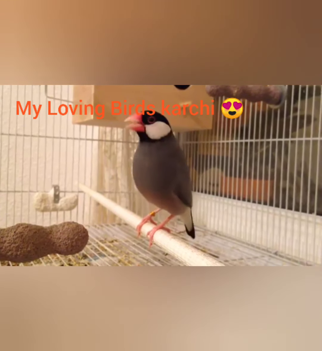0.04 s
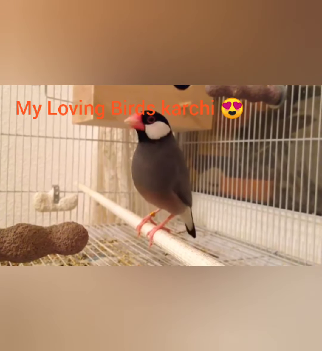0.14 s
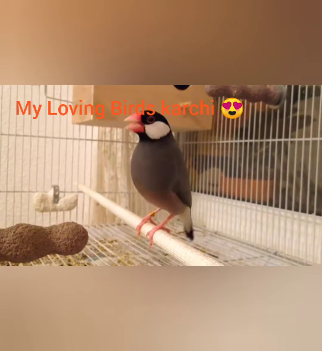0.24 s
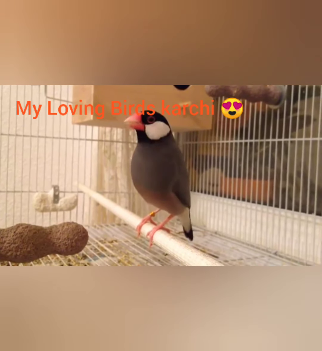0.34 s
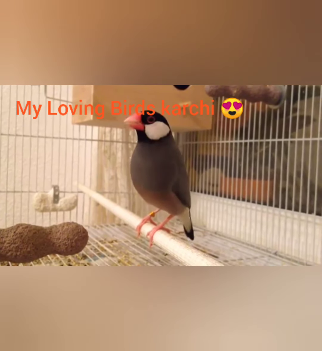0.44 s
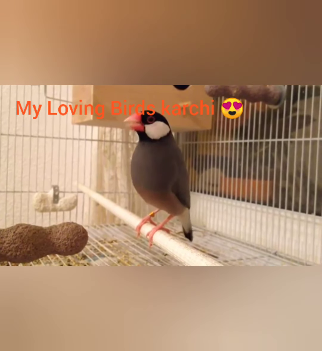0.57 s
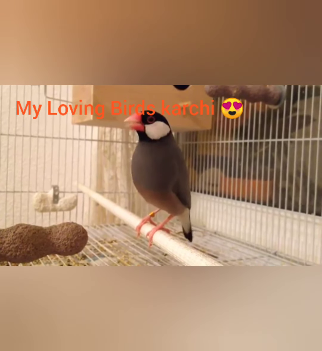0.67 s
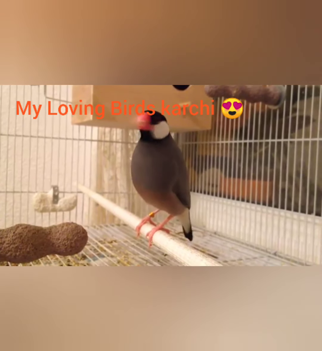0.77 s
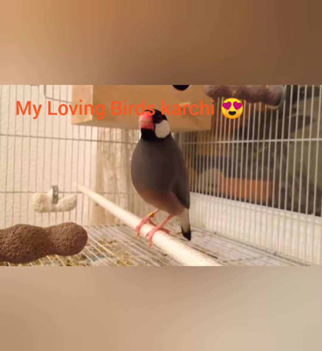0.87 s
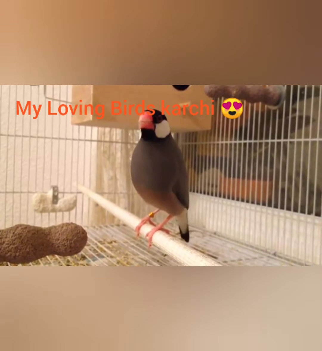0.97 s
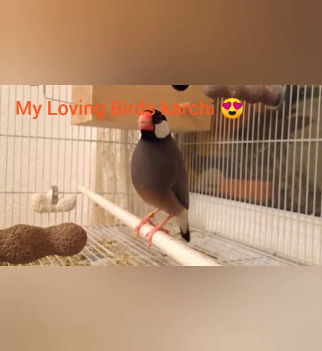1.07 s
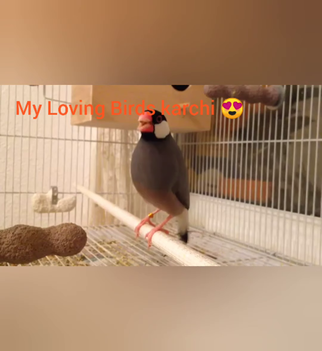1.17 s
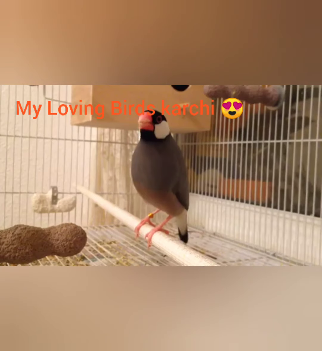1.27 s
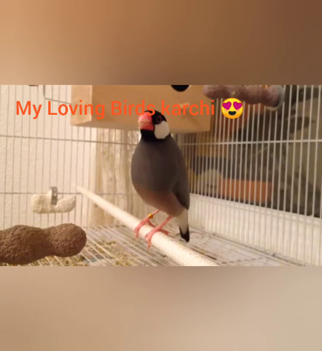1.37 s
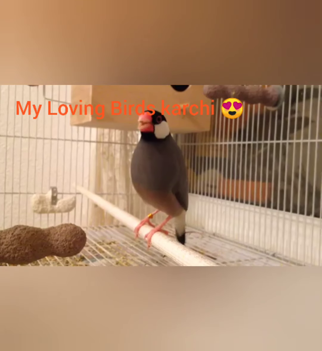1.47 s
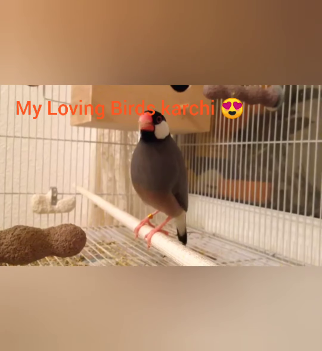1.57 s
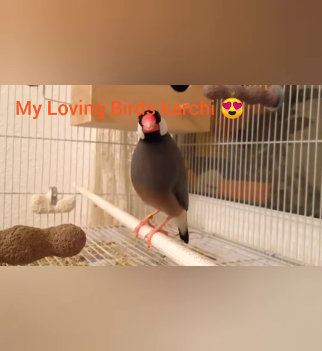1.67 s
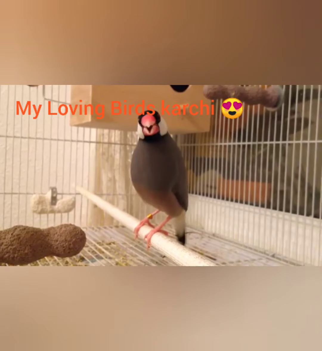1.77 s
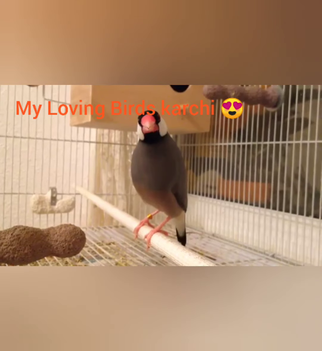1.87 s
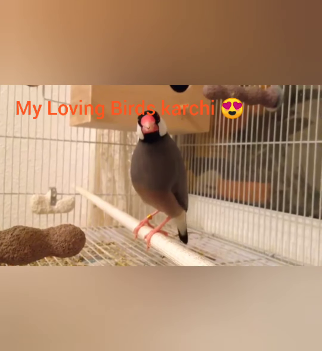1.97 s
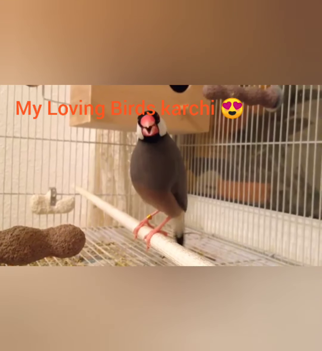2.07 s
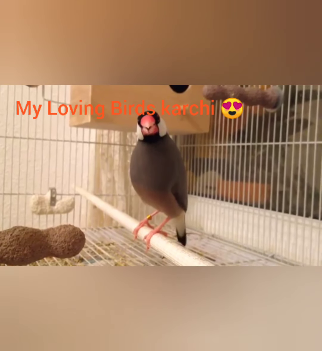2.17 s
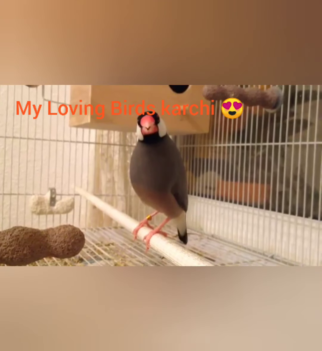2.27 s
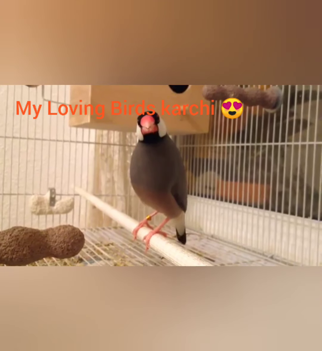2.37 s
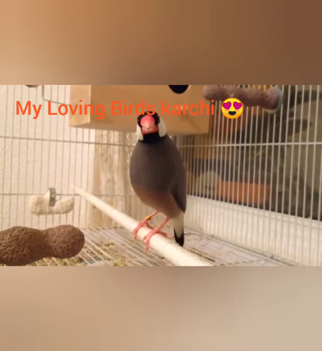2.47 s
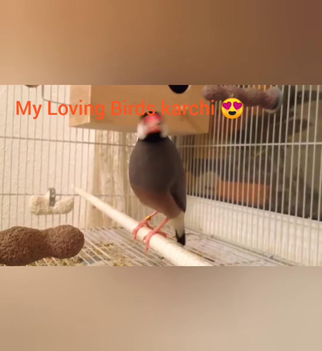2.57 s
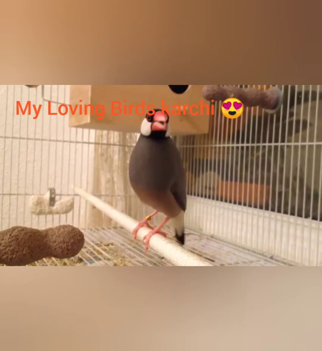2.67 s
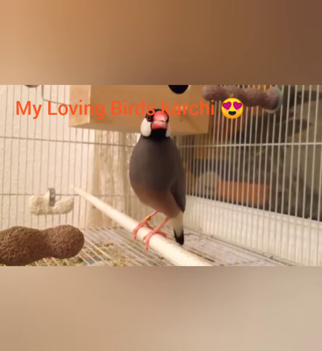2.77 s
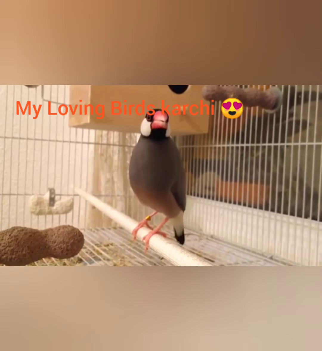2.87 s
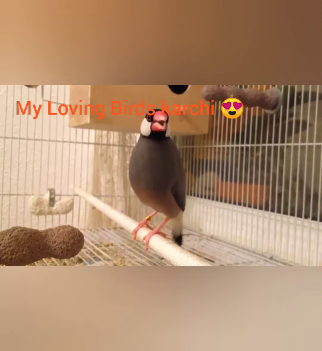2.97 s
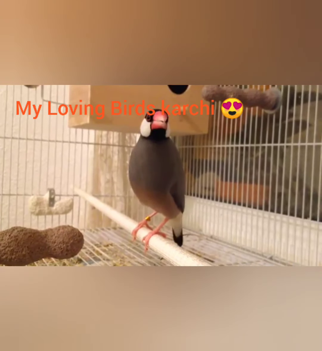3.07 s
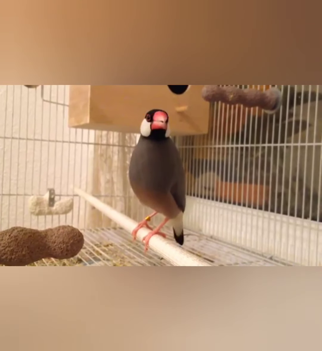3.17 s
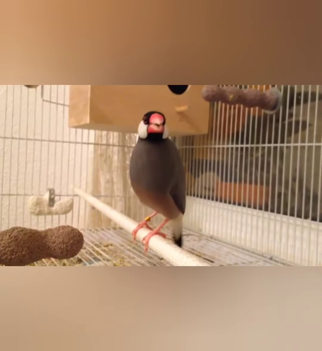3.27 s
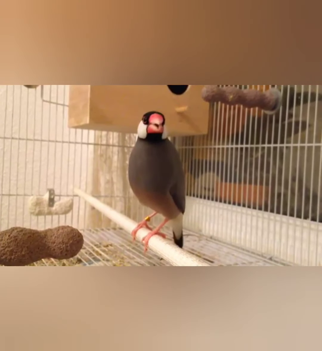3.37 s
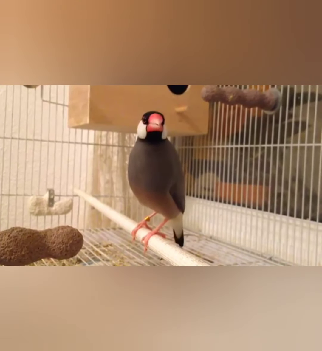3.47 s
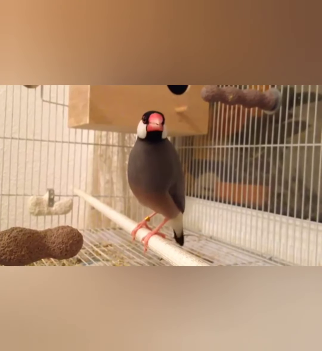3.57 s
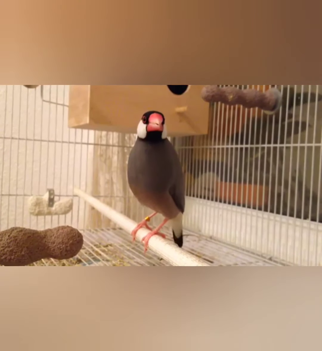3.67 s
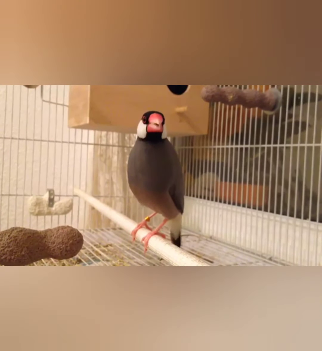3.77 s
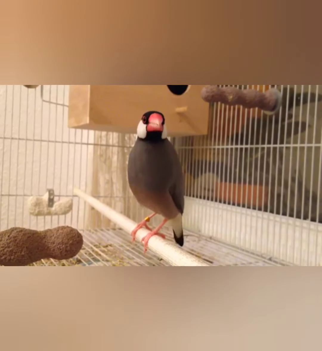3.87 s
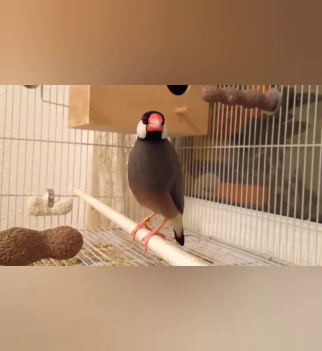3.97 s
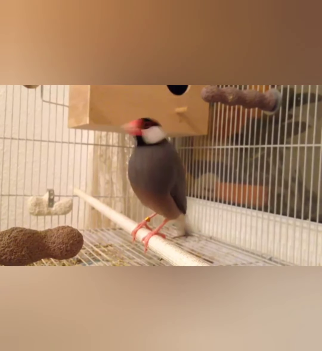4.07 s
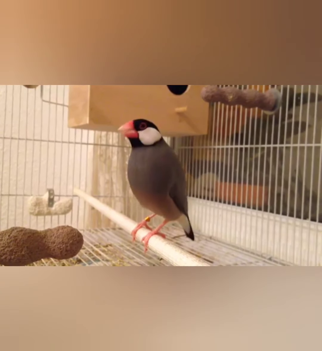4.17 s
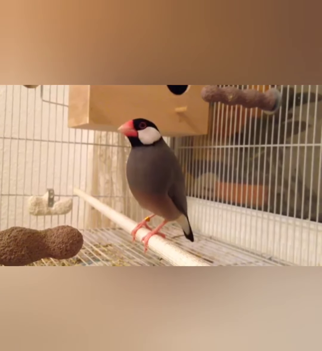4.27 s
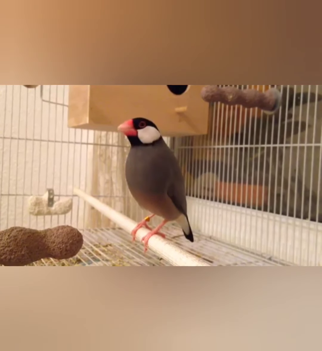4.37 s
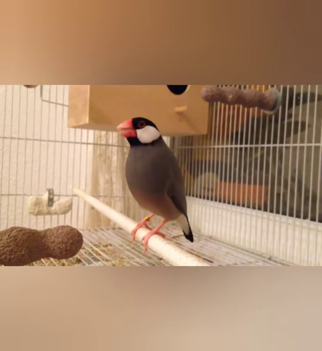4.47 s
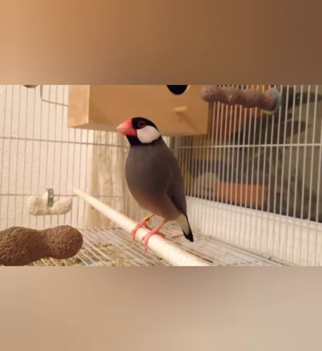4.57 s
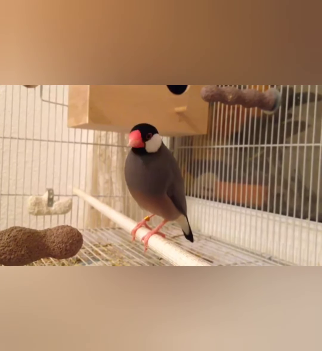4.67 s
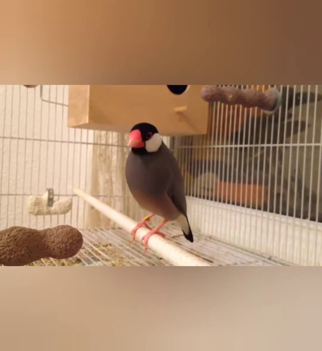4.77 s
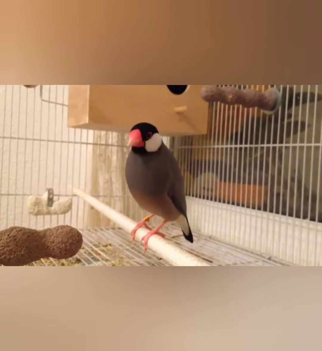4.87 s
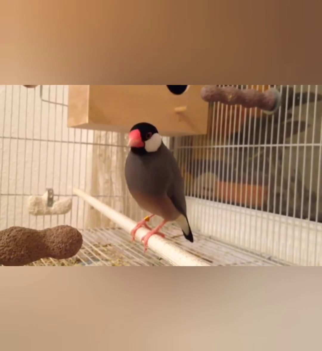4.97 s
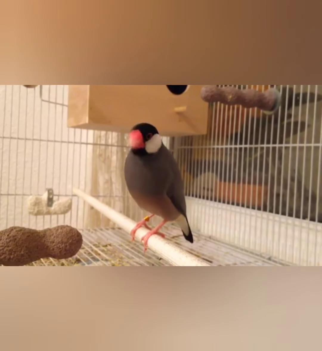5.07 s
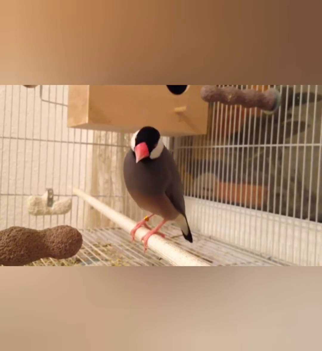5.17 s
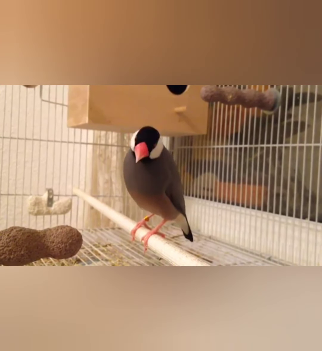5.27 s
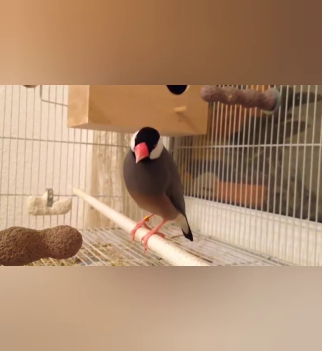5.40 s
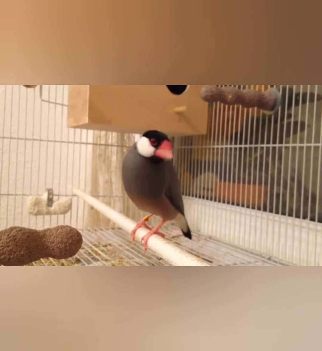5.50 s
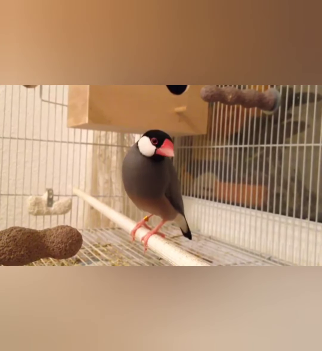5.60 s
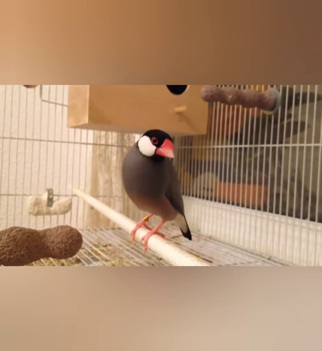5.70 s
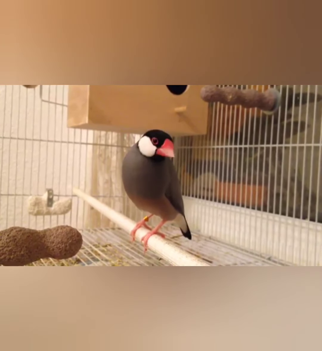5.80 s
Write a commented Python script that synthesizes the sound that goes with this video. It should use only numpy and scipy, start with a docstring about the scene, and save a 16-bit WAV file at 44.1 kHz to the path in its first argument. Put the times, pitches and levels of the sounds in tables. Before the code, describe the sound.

A caged finch sings three quick rounds of slurred chirps, rattles, peeps and loud chips, then falls silent over a faint room hum.

```python
"""The ring of a chip just sung dies away in a small room; then a caged finch, close to the microphone,
sings three rounds of one phrase and falls silent. Steep slurs break into a pulsed rattle; soft low
clucks, held peeps, flicks and a rising whistle lead to a loud chip. Its syrinx makes a nearly pure
tone that turns husky where it pulses. The room rings after every note, over soft air, a faint mains
hum and a few tiny ticks and fizzes."""
import sys
import numpy as np
from scipy import signal
from scipy.fft import rfft, irfft
from scipy.io import wavfile

SR = 44100
rng = np.random.default_rng(int(sys.argv[2]) if len(sys.argv) > 2 else 0)


def digitize_waveform(pressure):
    """Quantize a signal to 16-bit integers and store it at the path in sys.argv[1].

    Rows of a 2-D input are taken as channels; values are limited to [-1, 1].
    """
    field = np.atleast_2d(pressure).T
    bounded = np.clip(field, -1, 1)
    quanta = np.round(bounded * 32767).astype(np.int16)
    wavfile.write(sys.argv[1], SR, quanta)


N = 257544
LEAD = SR // 4  # samples of song before time zero, which still ring in the room


def gain_of(db):
    """Decibels to amplitude."""
    return 10 ** (np.asarray(db) / 20)


def unit_rms(x):
    """Scales to rms 1."""
    return x / np.sqrt(np.mean(x ** 2) + 1e-20)


def curve_at(points, hz):
    """Reads a table of (Hz, value) on a log-frequency axis."""
    points_hz, values = np.transpose(points)
    return np.interp(np.log(hz + 1), np.log(points_hz + 1), values)


def add(track, start_s, sound):
    """Adds a sound to a track that starts LEAD samples early."""
    part = track[max(LEAD + round(start_s * SR), 0):][:len(sound)]
    part += sound[:len(part)]


def ramp(t, length_s):
    """A smooth step from 0 at time zero to 1 after length_s."""
    return np.sin(np.pi / 2 * np.clip(t / length_s, 0, 1)) ** 2


def arch(t, width_s):
    """A smooth bump of height 1 around time zero."""
    return np.exp(-(t / width_s) ** 2)


def envelope(t, attack_s, release_s):
    """Attack, hold and release over the span of t."""
    return ramp(t - t[0], attack_s) * ramp(t[-1] - t, release_s)


def wander(t, rate_hz):
    """A smooth random drift of rms about 1, with motions up to rate_hz."""
    speeds, starts = rng.random((2, 16, 1))
    coarse_t = np.linspace(t[0], t[-1], int((t[-1] - t[0]) * rate_hz * 20) + 2)
    motions = np.sin(2 * np.pi * (speeds * rate_hz * coarse_t + starts))
    return np.interp(t, coarse_t, motions.sum(0) / np.sqrt(8))


def rasp(t, phase, spread_hz):
    """Turbulent air shakes a tone into a band of noise that follows its pitch."""
    return wander(t, spread_hz) * np.sin(phase) + wander(t, spread_hz) * np.cos(phase)


def pulsing(t, depth, pulse_hz):
    """The syrinx shuts and reopens at a nearly steady rate."""
    turns = pulse_hz * t + .0796 * wander(t, 70)
    opening = abs(np.cos(np.pi * turns)) ** 3
    return 1 - np.clip(depth, 0, 1) * (1 - opening)


# Overtone levels as heard at each pitch, with a gap just above 7.3 kHz; clean and rough scale them:
# pitch_hz, second_db, third_db
HEARD_OVERTONES = [(2200, -40.5, -51), (2843, -30.5, -42), (3640, -32, -56), (3663, -46.5, -64),
                   (4145, -36, -58.5), (4684, -27.5, -42), (4816, -24.5, -35)]
def syrinx(gesture, notes, pulse_hz, jitter, husk, fizz_db=-60, clean=.8, rough=.45, spread_hz=300):
    """A nearly pure tone follows a gesture's time, pitch, force and pulse depth; pulsing makes it husky."""
    out = np.zeros(LEAD + N)
    pitches, *overtones_db = np.transpose(HEARD_OVERTONES)
    for time_s, level_db, *shape in notes:
        t, hz, force, depth = gesture(*shape)
        hz = hz * (1 + jitter * wander(t, 350))
        phase = 2 * np.pi * np.cumsum(hz) / SR
        tone = np.sin(phase) + husk * depth * rasp(t, phase, 600)
        onset = np.interp(t, [0, .006], [1, 0])  # the fizz dies once the tone has locked in
        tone += gain_of(fizz_db) * onset * rasp(t, 1.2 * phase, 1400)
        for k, overtone_db in enumerate(overtones_db, 2):
            overtone = clean * np.sin(k * phase) + rough * rasp(t, k * phase, spread_hz)
            tone += gain_of(np.interp(hz, pitches, overtone_db)) * overtone
        swell = force * gain_of(level_db + .4 * wander(t, 150)) * signal.windows.tukey(len(t), .05)
        add(out, time_s + t[0], tone * swell * pulsing(t, depth, pulse_hz))
    return out


# Chips near the microphone, the first heard only as room ring:
# time_s, level_db, pitch_hz, sag_hz_per_s, hold_s
CHIP_NOTES = [(-.075, -9.5, 3905, 8000, 0.0085), (1.099, -12, 3710, 4500, .004),
              (2.598, -10, 3882, 7000, .009), (3.825, -10.5, 3859, 9000, 0.012)]
def chip(top_hz, sag_hz_per_s, hold_s, attack_s=.0064, scoop_hz=401, fade_db_per_s=678.5):
    """A loud clear note snaps up to its pitch, holds briefly, then sags and fades."""
    t = np.arange(-.005, .027, 1 / SR)
    scoop = scoop_hz * (1 - ramp(t - t[0], attack_s))
    hz = top_hz - scoop - sag_hz_per_s * np.maximum(t, 0)
    force = gain_of(-fade_db_per_s * np.maximum(t - hold_s, 0))
    return t, hz, force * envelope(t, attack_s, release_s=.005), 0


# How long the small room rings: frequency_hz, t60_s
ROOM_DECAY = [(800, 0.28), (2500, 0.4), (4000, 0.36), (5000, 0.39), (9500, 0.13), (15000, 0.17)]
# Its tail at the microphone, against the sound sent into the room: frequency_hz, level_db
ROOM_TAIL = [(800, -13.5), (2500, -11.5), (4000, -15), (5500, -8.5), (8500, -6), (15000, -6)]
def room(song, early_db=-21, build_s=.0017, tap_count=2000, tap_spacing=16, echo_count=6):
    """Cage and nest box echo, then a dense tail; treble is beamed past the microphone, so is wetter."""
    taps = np.zeros((tap_count, tap_spacing))
    signs = rng.choice([-1., 1.], tap_count)
    taps[np.arange(tap_count), rng.integers(0, tap_spacing, tap_count)] = signs
    hz, t, spectrum = signal.stft(taps.ravel(), SR, nperseg=256)
    t60 = curve_at(ROOM_DECAY, hz)[:, None]
    unit_energy = np.sqrt(2 * np.log(1000) * tap_spacing / (t60 * SR))
    colour = gain_of(curve_at(ROOM_TAIL, hz))[:, None]
    decay = np.exp(-np.log(1000) * t / t60)
    tail = signal.istft(spectrum * unit_energy * colour * decay, SR, nperseg=256)[1]
    response = tail * (1 - arch(np.arange(len(tail)) / SR, build_s))
    delays_s = rng.uniform(.0013, .016, echo_count)
    echoes = gain_of(early_db) * rng.choice([-1, 1], echo_count) / np.sqrt(echo_count)
    response[(delays_s * SR).astype(int)] += echoes
    return signal.fftconvolve(song, response)[:len(song)]


# Room tone around the microphone: frequency_hz, relative_density_db
AIR_SPECTRUM = [(65, -48.5), (110, -14), (196, -8), (227, -13), (303, -11), (366, -14.5), (440, -16),
                (531, -19.5), (613, -18), (770, -21.5), (3640, -36), (6110, -39), (9630, -44),
                (14300, -44.5), (15500, -46.5)]
def room_air(level_db=-61):
    """Soft, low room air whose level drifts a little."""
    t, hz = np.arange(N) / SR, np.fft.rfftfreq(N, 1 / SR)
    colour = gain_of(curve_at(AIR_SPECTRUM, hz))
    air = irfft(rfft(rng.standard_normal(N)) * colour, N)
    return unit_rms(air) * gain_of(level_db + .56 * wander(t, 3))


# Hum in the background of the room: pitch_hz, rms_db
HUM_TONES = [(98, -75.5), (199.3, -65.5), (441, -76)]
def mains_hum(flutter=.264):
    """A faint mains hum, each tone wavering in level and phase."""
    out, t = np.zeros(N), np.arange(N) / SR
    for hz, rms_db in HUM_TONES:
        swell = 1 + flutter * wander(t, 40)
        phase = 2 * np.pi * hz * t + .3 * wander(t, 7.8)
        out += gain_of(rms_db) * unit_rms(swell * np.sin(phase))
    return out


# Slurs, loud at close range: accent_s, level_db, top_pitch_hz, lead_in_s
SLUR_NOTES = [(0.108, -11.5, 5124, 0.031), (0.36, -10, 5140, 0.038), (1.270, -10.5, 5064, 0.034),
              (1.528, -10, 5150, 0.035), (1.858, -10.5, 5110, 0.038), (2.787, -11.5, 5087, 0.04),
              (3.066, -9.5, 5000, 0.038)]
def slur(top_hz, lead_s, low_hz=2394, drop_s=.019, creep_hz_per_s=7800, waver_hz=120,
         swell_db_per_s=425, fade_db_per_s=30.5):
    """A high, wavering lead-in swells, plunges through a loud accent and breaks into a low rattle."""
    t = np.arange(-lead_s, .056, 1 / SR)
    since_drop = t + .0084  # the pitch starts to drop just before the accent
    before, after = np.maximum(-since_drop, 0), np.maximum(since_drop, 0)
    height = np.exp(-(after / drop_s) ** 1.49)
    hz = low_hz + (top_hz - low_hz) * height - creep_hz_per_s * before
    unsettled = np.sqrt(before / lead_s)
    hz += waver_hz * unsettled * wander(t, 90)
    lead_db = -14 - swell_db_per_s * before
    tail_db = -16.5 - fade_db_per_s * after
    broken = ramp(t, .015)
    accent = arch(t - .0024, width_s=.0043)
    force = gain_of((1 - broken) * lead_db + broken * tail_db) + accent
    depth = .65 * unsettled + .92 * ramp(after, .027)  # pulsing clears, then builds with the drop
    return t, hz, force * envelope(t, attack_s=.007, release_s=.01037), depth


# A cluck's voice by register: pitch_hz, length_s, octave_db, pulse_depth, bend_ratio, hiss_db
CLUCK_REGISTERS = [(840, .014, -5, 0, 0.04, -26), (1096, 0.011, 6, 0.2, .36, -32.5),
                   (1220, 0.017, -22, 0.95, 0.22, -39.5)]
# Low clucks, soft even this close: centre_s, pitch_hz, level_db
CLUCK_NOTES = [(.220, 797, -41), (.445, 1247, -35), (0.976, 1050, -36), (1.385, 812, -40),
               (1.616, 1274, -33.5), (1.942, 1327, -36.5), (2.479, 1070, -33.5), (2.905, 851, -39),
               (3.151, 1286, -34), (3.702, 1057, -34.5)]
def clucks(pulse_hz=210, husk=.34, hiss_hz=8800):
    """A rounded pip with its octave and a trace of hiss; the pitch arches with the pressure."""
    out = np.zeros(LEAD + N)
    pitches, *voice = np.transpose(CLUCK_REGISTERS)
    for centre_s, hz, level_db in CLUCK_NOTES:
        length_s, octave_db, depth, bend, hiss_db = (np.interp(hz, pitches, column) for column in voice)
        t = np.arange(-length_s / 2, length_s / 2, 1 / SR)
        pressure = np.hanning(len(t))
        phase = 2 * np.pi * np.cumsum(hz * (1 + bend * (pressure - .84))) / SR
        tone = np.sin(phase) + gain_of(octave_db) * np.sin(2 * phase)
        tone *= 1 + husk * wander(t, 260)
        tone += gain_of(hiss_db) * rasp(t, 2 * np.pi * hiss_hz * t, 1400)
        add(out, centre_s + t[0], gain_of(level_db) * pressure * tone * pulsing(t, depth, pulse_hz))
    return out


# Peeps, close and clear: peak_s, level_db, pitch_hz, overshoot_hz, lead_in_s, fade_db_per_s
PEEP_NOTES = [(.627, -12.5, 4534, 480, 0.043, 649), (2.131, -13.5, 4616, 430, 0.035, 151),
              (3.339, -9, 4558, 290, .035, 802)]
def peep(held_hz, overshoot_hz, lead_s, fade_db_per_s, swell_db_per_s=1002.5, lift_hz=128):
    """A husky start overshoots, then swells into a clear held note that lifts at its end."""
    t = np.arange(-lead_s, .02, 1 / SR)
    before, after = np.maximum(-t - .002, 0), np.maximum(t - .002, 0)  # the peak holds for 4 ms
    hz = held_hz + overshoot_hz * arch(t + .019, width_s=.0082) + lift_hz * ramp(t, .01)
    force = gain_of(-swell_db_per_s * before - fade_db_per_s * after)
    depth = .97 * ramp(-t, lead_s)
    return t, hz, force * envelope(t, attack_s=.004, release_s=.006), depth


# Ticks and fizzes, faint at the microphone: start_s, level_db (6 dB above the opening rms), centre_hz
TICKS_AND_FIZZES = [(.646, -59, 12700), (2.214, -47, 7290), (2.397, -48, 8500), (3.033, -45.5, 6500),
                    (3.327, -40.5, 6200), (4.183, -58.5, 4500), (4.503, -57, 9000), (5.135, -60, 8980)]
def ticks_and_fizzes(decay_s=.00072):
    """Tiny ticks, and brief fizzes at note onsets: a millisecond of bright noise."""
    out, t = np.zeros(LEAD + N), np.arange(512) / SR
    for start_s, level_db, hz in TICKS_AND_FIZZES:
        colour = signal.butter(2, [hz * .72, hz * 1.35], "band", fs=SR)
        burst = signal.lfilter(*colour, rng.standard_normal(len(t)) * np.exp(-t / decay_s))
        opening_rms = np.sqrt(np.mean(burst[t < decay_s] ** 2))
        add(out, start_s, gain_of(level_db) * burst / opening_rms / 2)
    return out


# Rattles, faint at the microphone: start_s, level_db, start_pitch_hz
RATTLE_NOTES = [(.731, -42.5, 4550), (2.234, -41, 4722), (3.452, -45, 4090)]
def rattle(start_hz, low_hz=1380, start_db=-8, depth=.79):
    """A quiet run of pulses slides down and grows as it settles low."""
    t = np.arange(0, .045, 1 / SR)
    height = arch(t, width_s=.02)
    hz = low_hz + (start_hz - low_hz) * height
    force = gain_of(start_db * height)
    return t, hz, force * envelope(t, attack_s=.004, release_s=.011), depth


# Flicks, sharp at close range: peak_s, level_db, middle_pitch_hz, attack_s
FLICK_NOTES = [(0.892, -16.5, 4170, .009), (2.394, -16, 4346, .009), (3.614, -15.5, 4480, 0.0042)]
def flick(middle_hz, attack_s, bend_hz=150.5, bend_s=.003, low_hz=2900, hold_s=.00078,
          fade_db_per_s=2401):
    """A very fast fall that lingers on its middle pitch, where it is loudest."""
    t = np.arange(-attack_s, .013, 1 / SR)
    hz = np.maximum(middle_hz - bend_hz * np.sinh(t / bend_s), low_hz)
    force = ramp(t + attack_s, attack_s) * gain_of(-fade_db_per_s * np.maximum(t - hold_s, 0))
    depth = .43 * ramp(t, .013)
    return t, hz, force, depth


# Soft whistles from the cage, each leading to a chip: start_s, level_db, pitch_hz
WHISTLE_NOTES = [(0.983, -35, 2830), (2.487, -30, 2895), (3.717, -32, 2907)]
def whistle(pitch_hz, length_s=.108, scoop_hz=607.6, rise_hz=419.5, push_s=.014):
    """A soft clear tone scoops up to its pitch with a push, slackens, then climbs."""
    t = np.arange(0, length_s, 1 / SR)
    scoop = scoop_hz * (1 - ramp(t, .0083))
    climb = rise_hz * ramp(t - push_s, length_s - push_s)
    push_db = 8 * arch(t, push_s)
    slack_db = -10.5 * arch(t - .037, width_s=.04)
    force = gain_of(push_db + slack_db) * envelope(t, attack_s=.008, release_s=.008)
    return t, pitch_hz - scoop + climb, force, 0


def scene(soft_wet_db=4, chip_wet_db=1):
    """One microphone close to the cage; more of the soft notes arrives by way of the walls."""
    chips = syrinx(chip, CHIP_NOTES, pulse_hz=180, jitter=.0046, husk=0, fizz_db=-41.5)
    slurs = syrinx(slur, SLUR_NOTES, pulse_hz=183.4, jitter=.015, husk=.2747, fizz_db=-42,
                   clean=.66, rough=.5, spread_hz=270)
    peeps = syrinx(peep, PEEP_NOTES, pulse_hz=190, jitter=.005, husk=.45, fizz_db=-39,
                   clean=.676, rough=.22, spread_hz=400)
    rattles = syrinx(rattle, RATTLE_NOTES, pulse_hz=164, jitter=.074, husk=.55)
    flicks = syrinx(flick, FLICK_NOTES, pulse_hz=197, jitter=.008, husk=.38, fizz_db=-37,
                    clean=.83, rough=.46)
    whistles = syrinx(whistle, WHISTLE_NOTES, pulse_hz=180, jitter=.004785, husk=0, clean=.7, rough=.5)
    bright = slurs + peeps + ticks_and_fizzes() + flicks
    soft = clucks() + rattles + whistles
    ring = room(bright + gain_of(soft_wet_db) * soft + gain_of(chip_wet_db) * chips)
    song = (bright + soft + chips + ring)[LEAD:]
    return (song + room_air() + mains_hum())[None]


def record(dry, low_cut_hz=85, top_hz=15400):
    """The microphone sheds the deep bass; the highest treble is cut off."""
    low_cut = signal.butter(4, low_cut_hz, "high", fs=SR, output="sos")
    band_limit = signal.firwin(511, top_hz, window=("kaiser", 9), fs=SR)
    return signal.oaconvolve(signal.sosfilt(low_cut, dry), band_limit[None], "same")


dry = scene()
out = record(dry)
digitize_waveform(out)
```